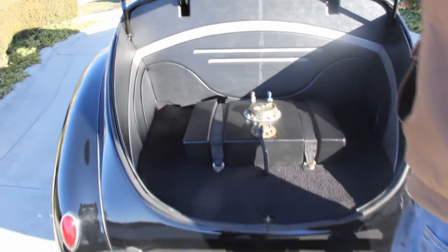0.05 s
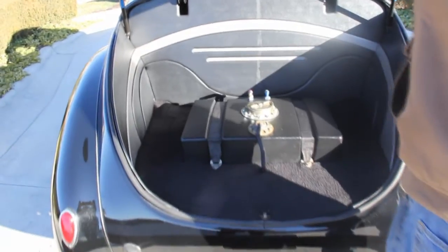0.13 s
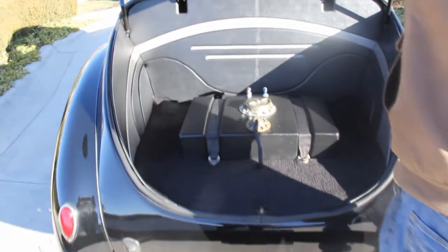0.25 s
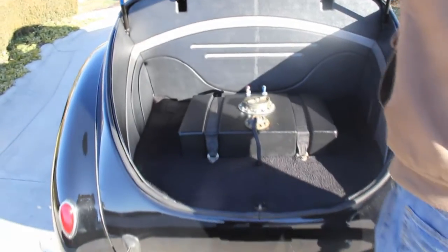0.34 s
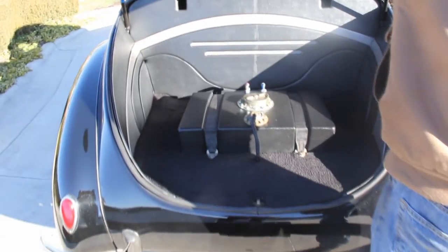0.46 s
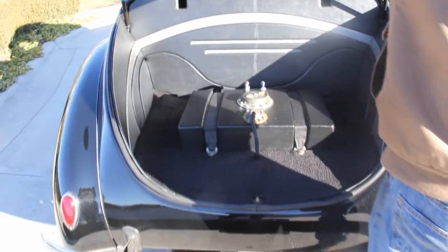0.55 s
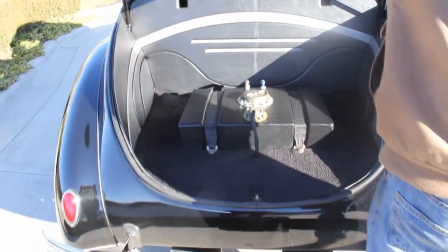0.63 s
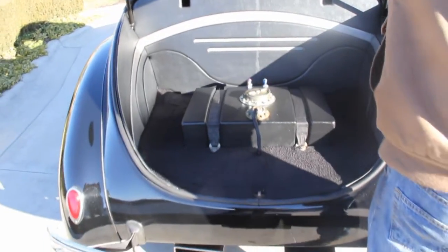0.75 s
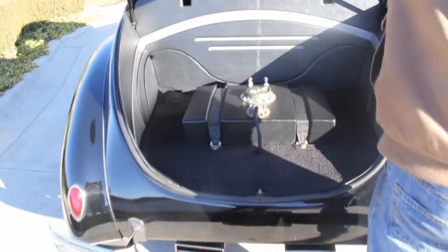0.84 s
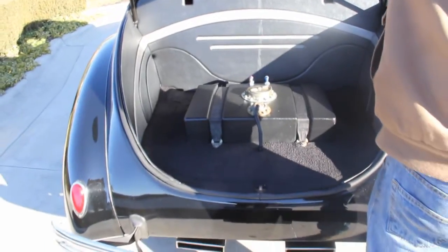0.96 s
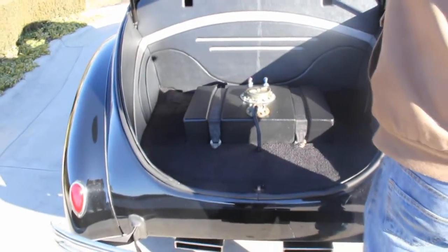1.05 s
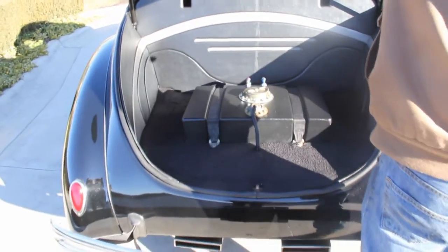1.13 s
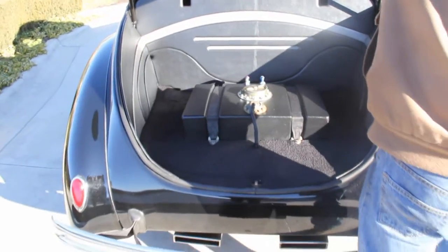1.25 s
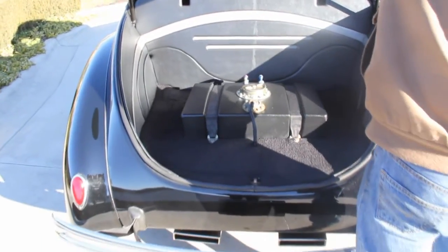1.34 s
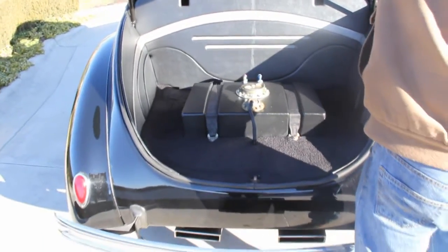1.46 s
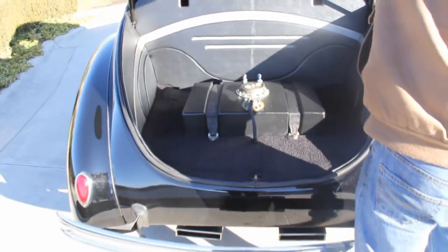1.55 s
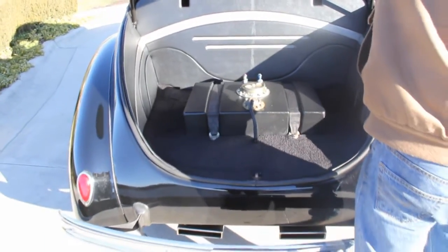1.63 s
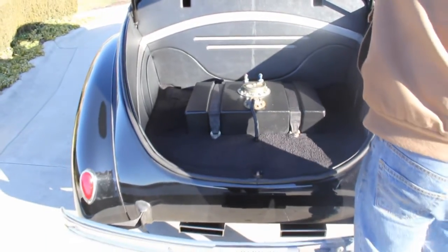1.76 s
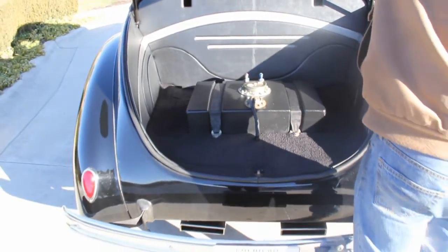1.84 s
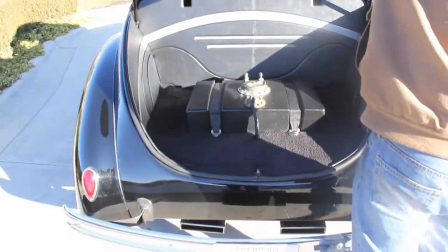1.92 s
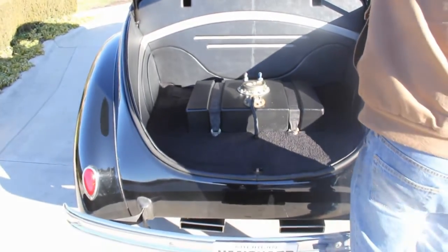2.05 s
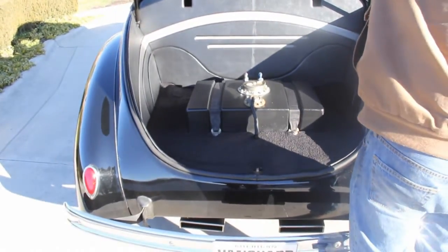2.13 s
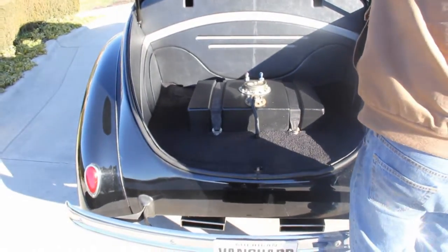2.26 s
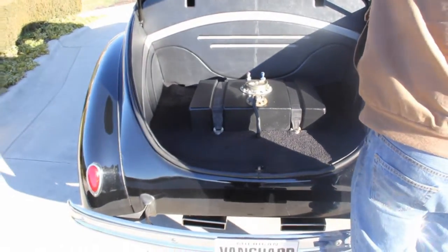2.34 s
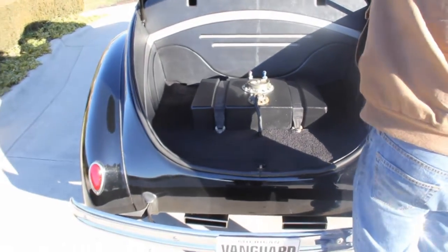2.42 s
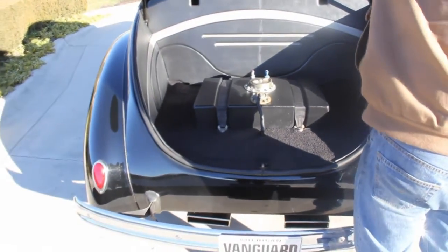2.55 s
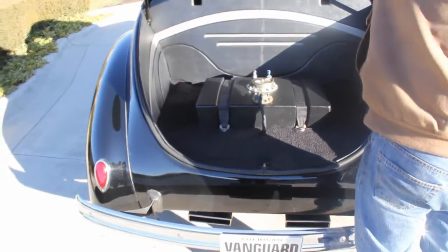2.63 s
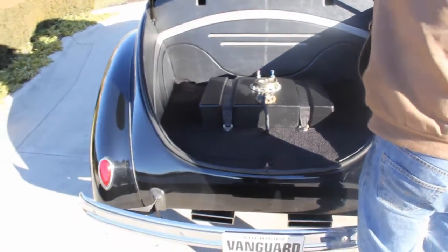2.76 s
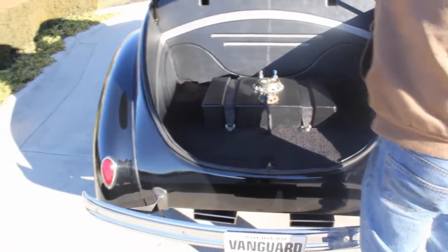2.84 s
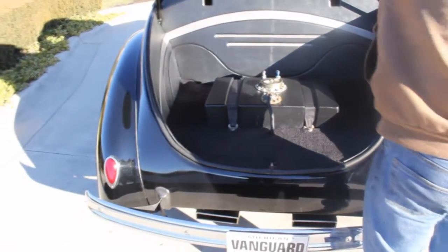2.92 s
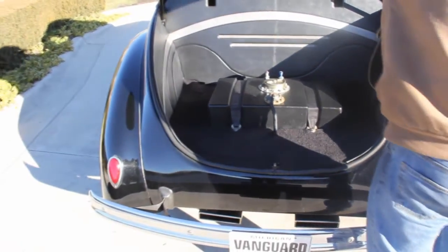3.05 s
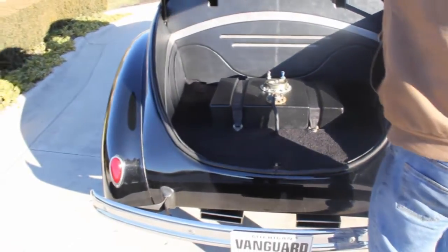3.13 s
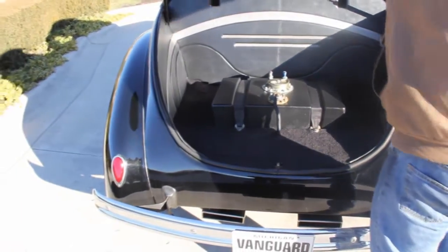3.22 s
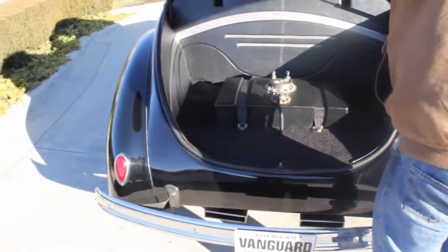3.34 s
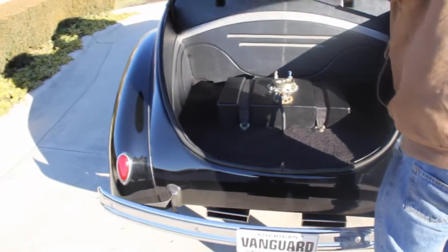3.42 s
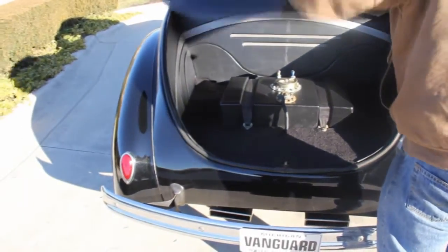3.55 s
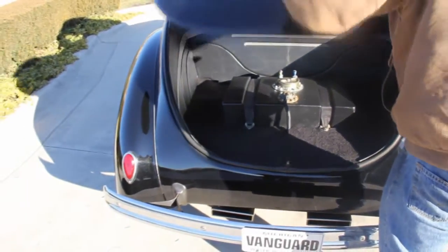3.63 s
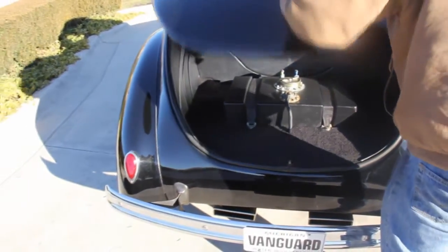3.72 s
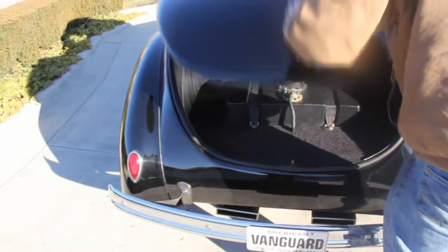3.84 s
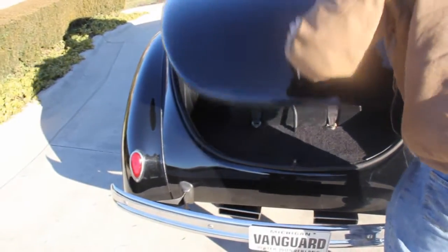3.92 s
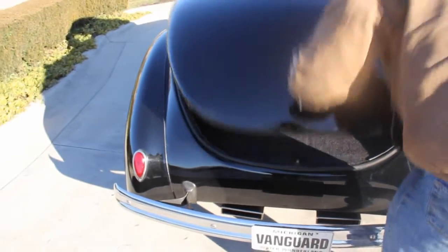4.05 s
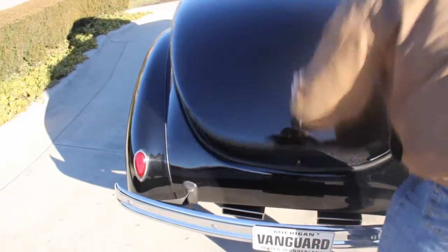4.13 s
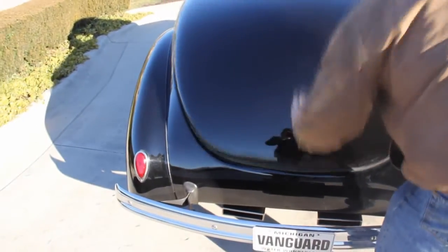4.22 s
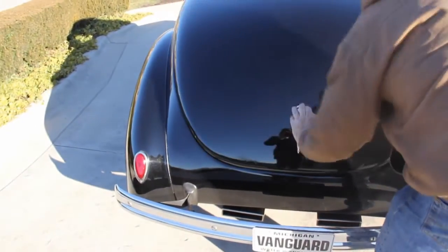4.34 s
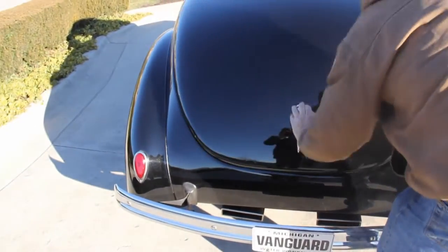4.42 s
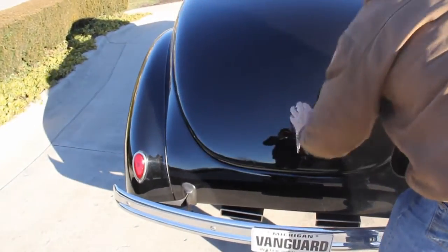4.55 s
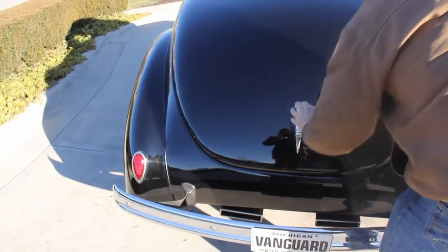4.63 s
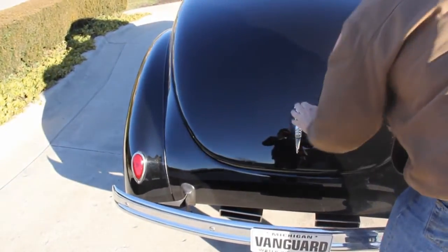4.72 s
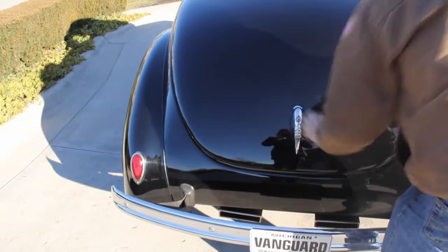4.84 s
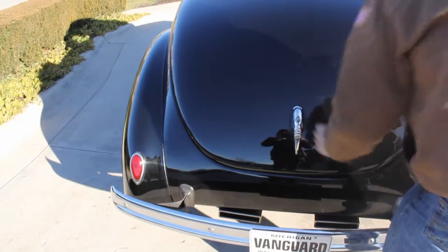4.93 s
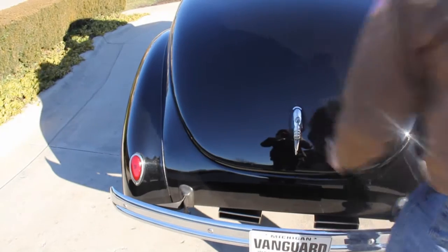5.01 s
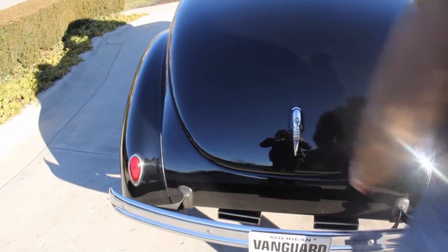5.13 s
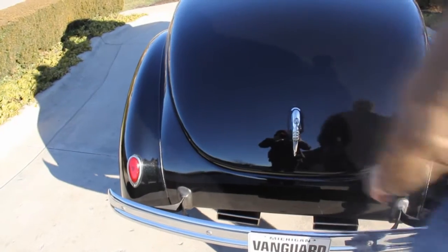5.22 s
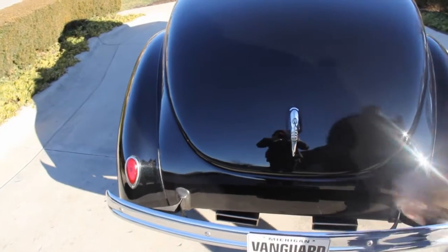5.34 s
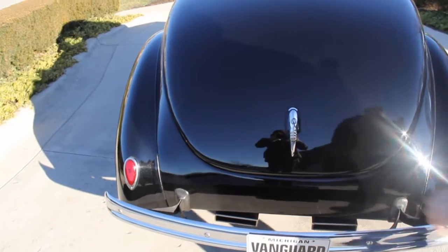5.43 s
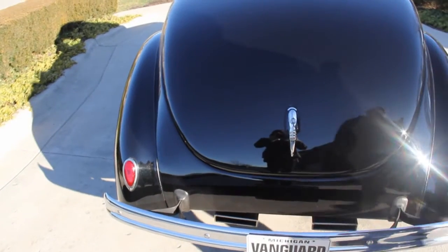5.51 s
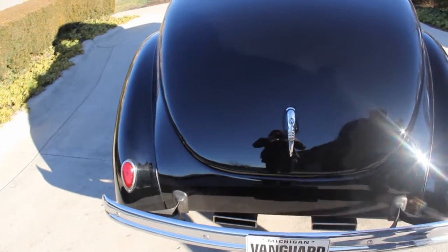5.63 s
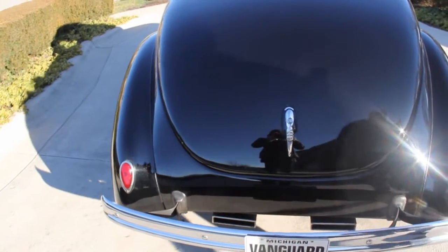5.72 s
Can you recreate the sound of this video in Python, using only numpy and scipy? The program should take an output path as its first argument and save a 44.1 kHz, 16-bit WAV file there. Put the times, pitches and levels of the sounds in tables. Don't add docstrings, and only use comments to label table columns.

```python
import sys
import numpy as np
from scipy import signal
from scipy.fft import rfft, irfft
from scipy.io import wavfile
from scipy.ndimage import uniform_filter1d

SR = 44100
rng = np.random.default_rng(int(sys.argv[2]) if len(sys.argv) > 2 else 0)


def to_wav(s):
    ch = np.atleast_2d(s).T
    pcm = np.round(np.clip(ch, -1, 1) * 32767)
    wavfile.write(sys.argv[1], SR, pcm.astype(np.int16))


def level_to_linear(level):
    exponent = np.asarray(level, float) / 20
    return 10 ** exponent


N = 254627
LEAD_S = 0.0004

# (time [s], crack [dB], panel [dB], boom [dB], outer skin [dB])
SLAM_BLOWS = [
    (4.3416, -9.5, -6.5, -6, -6),
    (4.346, -20.5, -8, -9.5, -10),
    (4.354, -22, -24, -32, -8),
    (4.3614, -11, -19, -33, -3),
    (4.367, -7.5, -3.5, -9, -1),
    (4.375, -16.5, -13, -10.5, 1),
    (4.384, -19.5, -18.5, -15.5, 1),
    (4.402, -29, -23.5, -27.5, -2),
    (4.425, -40, -32, -33, 3),
]
# (frequency [Hz], level [dB], decay t60 [s])
LID_MODES = [(150.5, -7.5, .36), (184, -3.5, 0.3), (260.7, 0.5, 0.33), (309.7, -3.5, 0.26),
             (383.1, -3.5, 0.32), (511.4, -3, 0.26), (625, -11.5, 0.4), (645, -10, 0.38), (656, -11, 0.22),
             (743.5, 1.5, 0.23), (835, -9.5, 0.34), (1018, -5, 0.14), (1137, -6.5, 0.2), (1976, -2, 0.12)]
# (frequency [Hz], decay t60 [s])
SHEET_DECAY = [(100, 0.44), (260, 0.27), (700, 0.25), (1840, 0.062), (3000, 0.14), (7000, 0.16)]
# (frequency [Hz], density [dB per Hz])
SHEET_COLOUR = [(60, -29), (105, -14), (150, -4), (310, -7), (450, -6.5), (690, -1.5), (1200, -7),
                (2000, -4), (2500, -25.5), (7000, -37)]
# (time [s], level [dB], frequency [Hz], length [cycles])
PANEL_SWELLS = [(4.348, -5, 183, 1.7), (4.35, -6, 520, 3.8), (4.3441, -13, 150, 1.1),
                (4.361, -19, 564, 3.3), (4.372, -8, 392, 4.8), (4.383, -5, 690, 9.6),
                (4.386, -14, 250, 3.7), (4.428, -14, 165, 2.9), (4.465, -25.5, 640, 12),
                (4.5, -27.5, 630, 13), (4.575, -37.5, 626, 12), (1.049, -17.5, 307, 2.9),
                (.422, -30.5, 390, 2.9), (.298, -39.5, 310, 5), (.647, -39.5, 250, 1.9),
                (1.054, -29, 1074, 9.7), (1.069, -24.5, 362, 7.4), (1.068, -37.5, 2140, 43),
                (1.096, -40, 333, 2.8), (2.26, -33, 319, 2.5), (2.337, -14.5, 594, 2.9),
                (2.358, -24, 259, 2.25), (2.429, -14, 341, 2.8), (2.447, -22, 290, 3),
                (3.35, -38, 473, 4.4), (3.497, -40, 710, 6)]
# (time [s], slip rate [Hz], level [dB])
HINGE_GROAN = [(3.7, 144.5, -63), (3.738, 161.2, -69), (3.776, 166.7, -67.5), (3.856, 174, -59),
               (3.915, 180.2, -57), (3.956, 204.6, -51.5), (3.975, 227, -65)]
# (time [s], slip rate [Hz], level [dB])
HINGE_SQUEAK = [(3.965, 360.1, -52), (4.009, 404, -50), (4.057, 424, -42.5), (4.087, 432, -50.5),
                (4.209, 461.5, -47), (4.245, 463, -50.5), (4.269, 484.3, -63), (4.285, 502.9, -69.5)]
# (frequency [Hz], level [dB])
HINGE_RESONANCES = [(330, 0), (400, -4), (432, -9), (465, 5), (570, 4), (740, 7.5), (870, -7), (920, -5.5),
                    (1000, -2), (1280, 2.5), (1520, -3), (1750, -12), (2150, -2), (2500, -14)]
# (time [s], level [dB])
STAY_SLIPS = [(2.939, -34), (2.994, -32.5), (3.026, -33.5), (3.048, -34.5), (3.069, -37.5), (3.091, -36.5),
              (3.11, -37), (3.128, -36), (3.139, -45), (3.154, -37), (3.167, -56)]
# (frequency [Hz], level [dB], decay t60 [s])
STAY_MODES = [(520, 2.5, 0.13), (803, 2.5, 0.099), (1190, -26, 0.044), (1277, -11.5, 0.12),
              (1509, 3, 0.066), (1917, 2, 0.042), (2370, -9, 0.083), (2710, 2.5, 0.024), (2860, 0, 0.024),
              (4000, -6, .02)]
# (time [s], tick [dB], clank [dB], thud [dB], tick colour [Hz])
KNOCKS = [(0.2883, -51, -48.5, -45, 3890), (0.4109, -40.5, -33.5, -38, 2800),
          (0.421, -41, -34.5, -42.5, 3000), (0.6417, -66, -56, -46.5, 2010),
          (0.7411, -40.5, -39, -39, 3570), (1.043, -18, -24.5, -23, 2550), (1.2509, -49, -50, -47, 2890),
          (1.4846, -50, -47.5, -42, 2050), (2.027, -40.5, -49, -48.5, 2410),
          (2.2387, -33, -33.5, -31.5, 2920), (2.332, -7, -17, -21.5, 3580),
          (2.393, -20.5, -29, -31.5, 2370), (2.4213, -29, -25, -22.5, 2200), (2.7707, -28, -37, -45, 4070),
          (3.4951, -40, -34.5, -46, 3100), (3.6444, -44, -49, -57, 3000), (3.654, -43, -45, -65, 2140)]
# (frequency [Hz], level [dB])
BODY_MODES = [(150, -11), (185, -4.5), (215, -1), (258, -2), (310, 0.5), (365, 3.5), (440, -6.5),
              (515, -5.5), (590, -1.5)]
# (time [s], level [dB], colour
# [Hz], decay t60 [s])
METAL_TICKS = [(0.7583, -26.5, 3510, 0.0071), (0.7997, -49.5, 3740, 0.031), (0.9174, -52, 3330, 0.018),
               (0.9592, -44, 4200, 0.0111), (1.014, -43, 3640, 0.0142), (1.2016, -44, 3250, 0.024),
               (1.3147, -49.5, 4740, 0.02), (1.3578, -51, 5220, 0.02), (1.435, -46.5, 5800, 0.016),
               (1.5474, -45, 2500, 0.014), (1.492, -52, 6500, .012), (1.509, -51, 6500, .012),
               (1.5335, -49, 3000, .012), (1.645, -49, 7000, .03), (1.706, -46, 5000, .01),
               (1.731, -44, 4500, .015), (1.743, -32.5, 4600, 0.0089), (1.076, -42, 3500, .01),
               (2.339, -24, 2000, 0.011), (2.35, -33, 2500, 0.0095), (2.404, -30, 3000, 0.014),
               (2.2963, -51, 2430, .015), (2.433, -36, 3200, 0.0155), (1.6352, -47, 5600, 0.022),
               (1.7123, -35.5, 5670, 0.012), (1.7485, -28, 2730, 0.02), (2.1156, -43, 5340, 0.015),
               (2.134, -45.5, 5600, 0.013), (2.1978, -40.5, 3460, 0.011), (2.2045, -38, 2300, 0.012),
               (2.4876, -30.5, 6400, 0.007), (2.6753, -46, 6450, 0.018), (2.716, -48.5, 3750, 0.026),
               (2.7494, -53, 1500, 0.018), (2.729, -47, 2500, 0.014), (2.791, -39, 2280, 0.017),
               (2.805, -46, 4500, .012), (3.626, -48, 5500, .012), (.81, -48, 3500, .012),
               (5.288, -46, 4000, .01), (5.762, -45, 3500, .015), (5.576, -50, 5000, .012),
               (2.8759, -42, 3640, 0.0143), (3.696, -36.5, 4800, 0.008), (3.7193, -48.5, 5000, 0.023),
               (4.6172, -36.5, 4900, 0.0238), (4.8218, -31.5, 6860, 0.011), (4.563, -45, 1200, .02),
               (5.2851, -38, 1243, 0.018), (5.6325, -39.5, 1190, 0.023),
               (4.298, -44, 4400, .03),
    (4.305, -41, 3500, .015),
    (4.3175, -38, 4000, .014),
    (4.322, -38, 3300, .018),
    (2.368, -42, 6000, .01),
    (4.480, -48, 5000, .04),
    (4.517, -48, 4000, .015),
    (4.554, -44, 4600, .02),
    (4.586, -48, 4700, .025),
]
# (time [s], level [dB])
CATCH_JINGLE = [(1.071, -47), (1.092, -28.5), (1.096, -24.5), (1.1148, -23.5), (1.1325, -44), (1.153, -51)]
# (frequency [Hz], level [dB], decay t60 [s])
CATCH_MODES = [(1500, -18, 0.04), (2640, -14, .015), (3374, -1, 0.042), (3520, 0, 0.025), (4900, 1, 0.015),
               (5330, 2, .022), (5610, 3, 0.028), (8100, 0, 0.025), (10500, -4, .02)]
# (time [s], level [dB], frequency [Hz], length [cycles])
SOFT_BUMPS = [(3.325, -32, 202, 3), (3.349, -26.5, 238, 3.2), (3.525, -33, 140, 1.6),
              (2.663, -24.5, 140, 3), (2.72, -35, 260, 4), (0.758, -41, 108, 3.6), (0.764, -36, 343, 6.8),
              (1.724, -40, 317, 8.4), (2.04, -40, 111, 4.3), (2.907, -33, 148, 3), (3.629, -49, 112.3, 3.4),
              (4.788, -36.5, 144.7, 2.1), (4.899, -44, 111, 2.4), (5.031, -43, 128.2, 2),
              (5.29, -40.5, 307, 1.9), (5.419, -32.5, 154, 1.05), (5.709, -32, 147, 0.65),
              (1.076, -24, 219.3, 3.7)]
# (time [s], level [dB], frequency [Hz])
AIR_PUFFS = [(2.514, -42, 271), (2.611, -40, 129), (2.631, -18.5, 205), (2.651, -20.5, 178.4),
             (2.682, -30, 164), (2.707, -29.5, 196), (2.727, -28, 137), (2.751, -23, 214),
             (2.832, -17.5, 196), (2.848, -15.5, 184), (2.878, -24, 143), (2.972, -27, 209),
             (2.989, -25.5, 158.6), (3.203, -31.5, 148), (3.341, -24.5, 264), (3.362, -26, 201),
             (3.388, -32, 172), (3.443, -25, 166), (3.499, -27, 148), (3.555, -24, 169),
             (3.578, -37.5, 152.3), (3.954, -43, 144), (4.249, -36, 133), (4.554, -24.5, 180),
             (4.619, -26, 170), (5.476, -22.5, 152), (5.535, -34.5, 212), (5.561, -41, 162),
             (5.584, -30, 184), (5.609, -26, 131.8)]
# (peak time [s], swell [s], die [s], hiss [dB], rub [dB])
SLEEVE_STROKES = [(0.0, .1, 0.039, -96.5, -83), (.44, 0.18, 0.067, -64, -65), (.72, 0.08, 0.146, -71, -84),
                  (1.139, 0.11, 0.066, -49.5, -48.5), (1.73, 0.051, 0.057, -71.5, -57.5),
                  (2.399, 0.094, 0.91, -63, -94), (2.91, 0.028, 0.056, -59, -66),
                  (2.957, 0.02, 0.037, -46.5, -46.5), (3.12, 0.16, 0.12, -73, -50.5),
                  (3.461, 0.22, 0.057, -44, -45.5), (3.565, 0.11, 0.022, -49, -49.5),
                  (3.93, 0.091, 0.34, -65, -58), (4.14, 0.052, 0.042, -48.5, -55),
                  (4.449, 0.27, 0.12, -63, -47), (4.7, 0.18, 0.18, -75, -63.5),
                  (5.2, 0.097, 0.11, -52, -54.5), (5.469, 0.031, 0.17, -56, -54.5),
                  (5.77, 0.062, 0.13, -63, -58)]
# (frequency [Hz], density [dB per Hz])
HISS_COLOUR = [(1500, -11.5), (2800, 1), (4300, 3), (6500, -0.5), (10000, -1), (12000, -15.5),
               (16000, -38.5)]
# (frequency [Hz], density [dB per Hz])
RUB_COLOUR = [(250, -13.5), (500, -4), (1000, -2.5), (1600, -5), (2500, -13.5), (5000, -23)]
# (time [s], level [dB])
BREEZE_LEVEL = [(0.0, -50), (0.14, -61), (2.02, -58), (2.3, -51), (2.42, -35.5), (2.5, -56.5),
                (2.66, -41.5), (2.84, -43.5), (3.05, -52.5), (3.41, -44), (3.69, -57), (4.2, -58.5),
                (4.3, -44), (4.62, -42.5), (4.958, -61.5), (5.3, -60), (5.56, -50), (5.77, -62)]
# (frequency [Hz], density [dB per Hz])
BREEZE_COLOUR = [(25, -21), (60, -5), (125, 5), (200, 1), (350, -5.5), (600, -19), (1200, -56)]
# (frequency [Hz], density [dB per Hz])
TRAFFIC_COLOUR = [(30, -17), (60, -8), (125, -9), (300, -7.5), (1000, -14.5), (2000, -20), (6000, -38),
                  (16000, -26)]
# (frequency [Hz], gain [dB])
MIC_RESPONSE = [(20, -24), (50, -8.5), (110, 3), (6600, -5.5), (7300, -15), (8000, -26), (9300, -18.5),
                (10500, -23.5), (12500, -34), (16000, -53)]


def along(points, hz):
    f, v = np.transpose(points)
    return np.interp(np.log(np.maximum(hz, 1)), np.log(f), v)


def noise(points, size):
    spectrum = rfft(rng.standard_normal(size))
    x = irfft(spectrum * level_to_linear(along(points, np.fft.rfftfreq(size, 1 / SR))), size)
    return x / np.sqrt(np.mean(x ** 2))


def band(hz, octaves, size):
    steps = np.array([-4, -2, -1, 0, 1, 2, 4])
    return noise(np.c_[hz * 2. ** (steps * octaves), [-90, -36, -12, 0, -10, -28, -90]], size)


def fade(t, t60, rise):
    return (1 - np.exp(-t / rise)) * np.exp(-np.log(1000) * t / t60)


def ring(t, hz, db, t60, scatter_db=5.0, detune=0.018):
    size, tune, phase = rng.standard_normal((3, len(hz), 1))
    gains = level_to_linear(np.c_[db] + scatter_db * size) * np.exp(-np.log(1000) * t / np.c_[t60])
    x = (gains * np.sin(2 * np.pi * np.c_[hz] * (1 + detune * tune) * t + 3 * phase)).sum(axis=0)
    return x / np.sqrt(np.sum(level_to_linear(db) ** 2) / 2)


def add(out, s, x):
    i = max(int(s * SR), 0)
    out[i:i + len(x)] += x[:N - i]


def walk(rate):
    hold = int(SR / rate)
    held = np.repeat(rng.standard_normal(N // hold + 1), hold)
    return 1.15 * uniform_filter1d(uniform_filter1d(held, hold), hold)[:N]


def slam():
    out, t = np.zeros(N), np.arange(2 ** 15) / SR
    hz, db, t60 = np.transpose(LID_MODES)
    centres = 80 * 2 ** np.arange(0, 7, .5)
    weights = level_to_linear(along(SHEET_COLOUR, centres)) * np.sqrt(centres)
    for s, crack_db, panel_db, boom_db, skin_db in SLAM_BLOWS:
        crack = band(3100, 1.2, len(t)) * fade(t, 0.038, 0.00013)
        crack += level_to_linear(-25.0) * band(1550, 0.6, len(t)) * fade(t, 0.31, 0.009)
        sheet = np.zeros(len(t))
        for f, weight in zip(centres, weights * level_to_linear(skin_lift(centres, skin_db))):
            sheet += weight * band(f, 0.3, len(t)) * fade(t, along(SHEET_DECAY, f), 0.00023)
        sheet /= np.linalg.norm(weights)
        boom = ring(t, hz, db + skin_lift(hz, skin_db), t60, scatter_db=2.5, detune=0.012)
        boom *= fade(t, 0.14, 0.0021) + level_to_linear(-5.5) * fade(t, 8.0, 0.002)
        add(out, s, level_to_linear(crack_db) * crack + level_to_linear(panel_db) * sheet + level_to_linear(boom_db) * boom)
    return out


def skin_lift(hz, skin_db):
    return skin_db * np.exp(-(np.log2(hz / 690) / 0.33) ** 2)


def panel_swells():
    out, t = np.zeros(N), np.arange(-2048, 4096) / SR
    for s, db, hz, cycles in PANEL_SWELLS:
        wide = (2.0 * hz * t / (cycles * np.where(t > 0, 1.6, 1))) ** 2
        tone = np.cos(2 * np.pi * (hz * t + rng.random()))
        add(out, s + t[0], level_to_linear(db - 2.5) * np.exp(-wide) * tone)
    return out


def hinge():
    s, (hz, db) = spread(HINGE_GROAN)
    tilt_db = -0.08 - .035 * np.maximum(hz - 180, 0)
    groan = stick_slip(s, hz, overtones(hz, db, range(2, 11), tilt_db), flutter_db=5.0)

    s, (hz, db) = spread(HINGE_SQUEAK)
    t = np.arange(len(hz)) / SR
    half_rate = (.53, -55 - 2500 * (t - .05) ** 2)
    lower = overtones(hz, db, range(1, 4), -1)
    upper = overtones(hz, db, range(4, 7), -1 - 22 * t)
    return groan + stick_slip(s, hz, [half_rate, *lower, *upper], flutter_db=3.2)


def spread(table):
    s, *columns = np.transpose(table)
    t = np.arange(s[0] * SR, s[-1] * SR) / SR
    return s[0], [np.interp(t, s, c) for c in columns]


def overtones(hz, db, multiples, tilt_db):
    return [(k, db + tilt_db * k + along(HINGE_RESONANCES, k * hz)) for k in multiples]


def stick_slip(start_s, hz, lines_db, flutter_db):
    size = len(hz)
    phase = 2 * np.pi * np.cumsum(hz * (1 + 0.0067 * walk(85)[:size])) / SR
    x = np.zeros(size)
    for k, db in lines_db:
        x += level_to_linear(db + 2.0 + flutter_db * walk(25.8)[:size]) * np.sin(k * phase + k * k)
    out = np.zeros(N)
    add(out, start_s, x * signal.windows.tukey(size, .08))
    return out


def creak():
    out, t = np.zeros(N), np.arange(2 ** 13) / SR
    rings = []
    for modes in (STAY_MODES[:6], STAY_MODES[6:]):
        modal = ring(t, *np.transpose(modes), scatter_db=1.5, detune=0.0018)
        rings.append(modal * fade(t, 3.12, 0.00096))
    for s, db in STAY_SLIPS:
        since = s - STAY_SLIPS[0][0]
        stiff = t * (1 + .12 * (since - .1) + .004 * rng.standard_normal())
        low, high = (np.interp(stiff, t, part) for part in rings)
        snap = band(4200, 1.8, len(t)) * fade(t, 0.019, 0.0008) * level_to_linear(0.5 - 64 * since)
        grit = band(1200, 1.8, len(t)) * fade(t, 0.033, 0.001)
        slip = 0.77 * low + level_to_linear(0.5 - 35 * since) * high + level_to_linear(-7) * grit + snap
        add(out, s - LEAD_S, level_to_linear(db) * slip)
    return out


def handling():
    return knocks() + ticks() + jingle()


def knocks():
    out, t = np.zeros(N), np.arange(2 ** 13) / SR
    hz, db = np.transpose(BODY_MODES)
    t60 = 0.082
    for s, tick_db, clank_db, thud_db, tick_hz in KNOCKS:
        clank_fade = fade(t, 1.05 * t60, 0.00069) + level_to_linear(-8.0) * fade(t, 2.46 * t60, 0.0086)
        clank = band(927, 1.0, len(t)) * clank_fade
        thud = ring(t, hz, db, 4.2 * t60 * (300 / hz) ** 0.5)
        thud += 0.58 * band(310, 1.0, len(t)) * fade(t, 7.5 * t60, 0.0009)
        thud *= fade(t, 0.933, 0.0097) * (np.exp(-(t / (0.39 * t60)) ** 2) + level_to_linear(-4.0))
        contact = tick(t, tick_hz, 0.54 * t60)
        knock = level_to_linear(tick_db - 5) * contact + level_to_linear(clank_db - 3.0) * clank + level_to_linear(thud_db - 2) * thud
        add(out, s - LEAD_S, knock)
    return out


def ticks():
    out, t = np.zeros(N), np.arange(2 ** 13) / SR
    for s, db, hz, t60 in METAL_TICKS:
        add(out, s - LEAD_S, level_to_linear(db - 0.5) * tick(t, hz, t60))
    return out


def tick(t, hz, t60):
    edge = band(8000, 1.0, len(t)) * fade(t, 0.47 * t60, 0.00025) * (hz / 5000) ** 1.18
    contact_fade = fade(t, t60, 0.0003) + level_to_linear(-16.0) * fade(t, 1.5 * t60, 0.0087)
    return band(hz, 1.0, len(t)) * contact_fade + level_to_linear(1.0) * edge


def jingle():
    out, t = np.zeros(N), np.arange(2 ** 13) / SR
    for s, db in CATCH_JINGLE:
        modes = ring(t, *np.transpose(CATCH_MODES), scatter_db=6.5) * fade(t, 3., 0.00043)
        add(out, s, level_to_linear(db) * (modes + 0.6 * tick(t, 5700, 0.034)))
    return out


def bumps():
    return wobbles(SOFT_BUMPS)


def sleeves():
    t = np.arange(N) / SR
    s, swell, die, hiss_db, rub_db = np.transpose(SLEEVE_STROKES)[:, :, None]
    stroke = np.exp(-1.5 * ((t - s) / np.where(t < s, swell, die)) ** 2)
    hiss_gain = level_to_linear(-66) + (level_to_linear(hiss_db) * stroke).sum(axis=0)
    rub_gain = level_to_linear(-64) + (level_to_linear(rub_db) * stroke).sum(axis=0)
    hiss = noise(HISS_COLOUR, N) * hiss_gain * level_to_linear(0.5 * walk(36) + 1.8 * walk(400))
    rub = noise(RUB_COLOUR, N) * rub_gain * level_to_linear(1.8 * walk(30) + 1.4 * walk(180))
    return hiss + rub


def smooth_sleeve():
    t = np.arange(N) / SR
    return band(4300, 0.285, N) * level_to_linear(-61.5) * np.exp(-((t - .33) / 0.16) ** 2)


def puffs():
    return wobbles([(s, db, hz, 0.79 + 0.5 * max(-29.5 - db, 0)) for s, db, hz in AIR_PUFFS])


def wobbles(events):
    out, t = np.zeros(N), np.arange(-2048, 2048) / SR
    for s, db, hz, cycles in events:
        turns = hz * t * (1 - 7.7 * t) + rng.random()
        wide = (2.0 * hz * t / cycles) ** 2
        shape = np.exp(-wide) + level_to_linear(-13.5) * np.exp(-wide / 3.8 ** 2)
        add(out, s + t[0], level_to_linear(db - 3.0) * shape * np.hanning(len(t)) * np.cos(2 * np.pi * turns))
    return out


def breeze():
    level_db = np.interp(np.arange(N) / SR, *np.transpose(BREEZE_LEVEL))
    return noise(BREEZE_COLOUR, N) * level_to_linear(level_db + 3.1 * walk(35))


def traffic():
    return noise(TRAFFIC_COLOUR, N) * level_to_linear(-59)


def scene():
    metal = handling() + slam() + creak() + hinge()
    soft = puffs() + bumps() + panel_swells()
    air = sleeves() + breeze() + smooth_sleeve() + traffic()
    return (metal + soft + air)[None]


def top_cut(x):
    return signal.sosfilt(signal.butter(12, 15600, fs=SR, output="sos"), x)


def record(dry):
    log_gain = np.log(level_to_linear(along(MIC_RESPONSE, np.fft.rfftfreq(1024, 1 / SR))))
    cepstrum = irfft(log_gain)
    cepstrum = np.r_[cepstrum[0], 2 * cepstrum[1:512], np.zeros(512)]
    response = irfft(np.exp(rfft(cepstrum)))
    x = signal.fftconvolve(dry, response[None], axes=1)[:, :N]
    return top_cut(np.clip(x, -1, 1))


dry = scene()
out = record(dry)
to_wav(out)
```